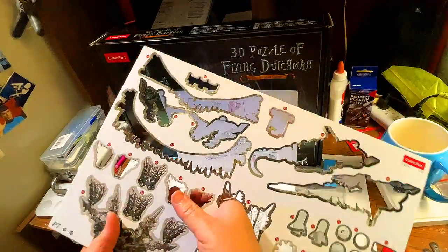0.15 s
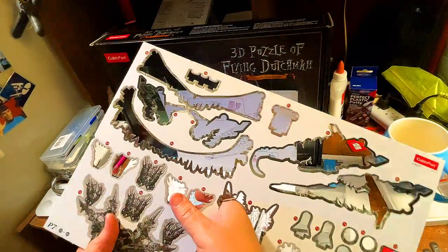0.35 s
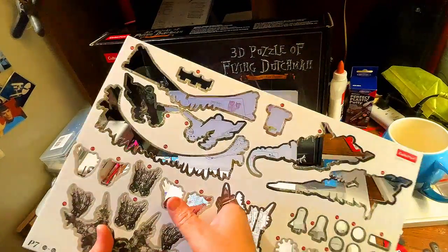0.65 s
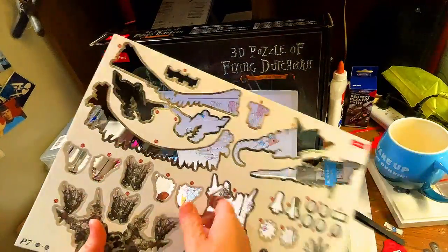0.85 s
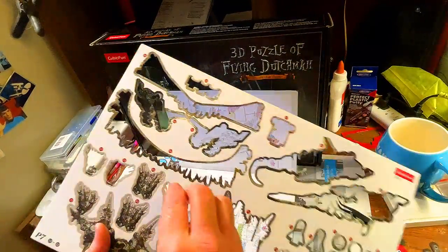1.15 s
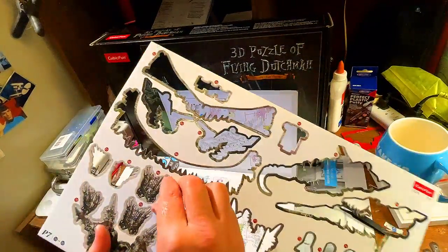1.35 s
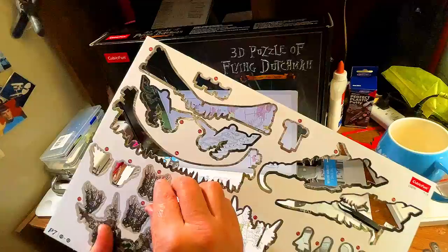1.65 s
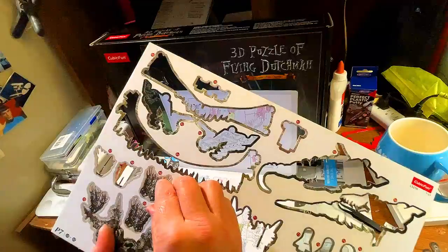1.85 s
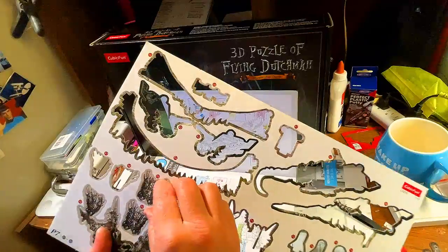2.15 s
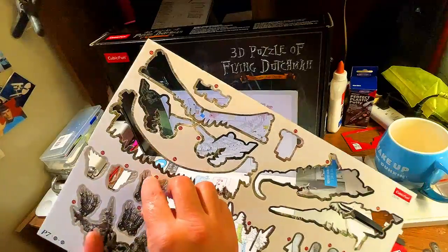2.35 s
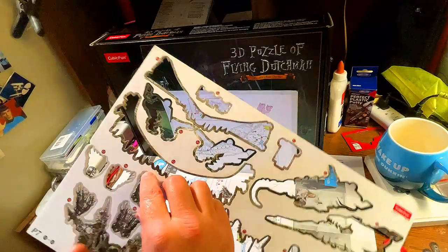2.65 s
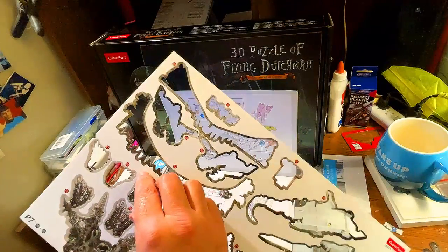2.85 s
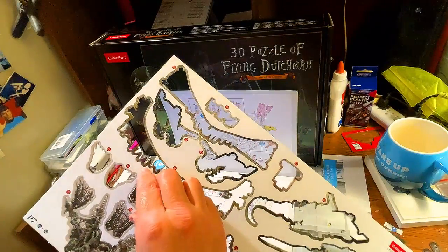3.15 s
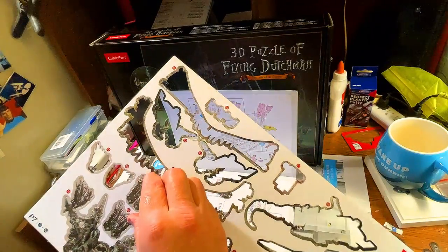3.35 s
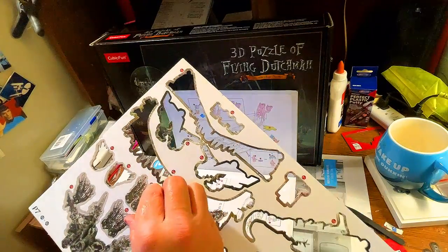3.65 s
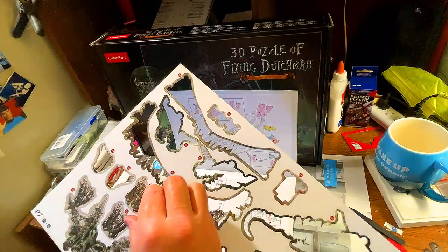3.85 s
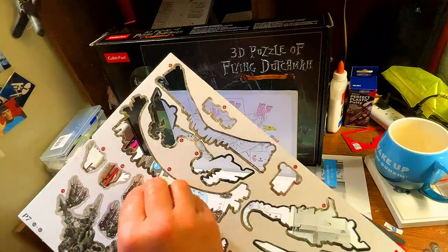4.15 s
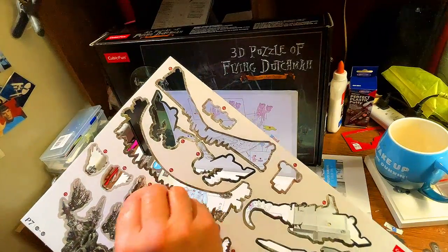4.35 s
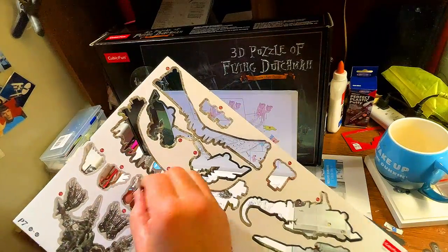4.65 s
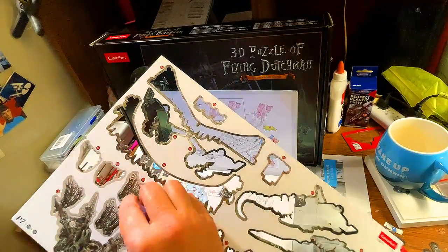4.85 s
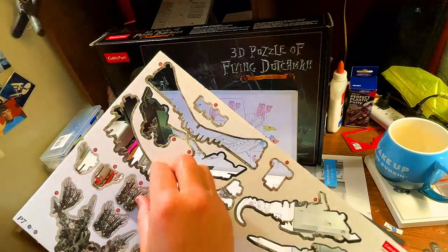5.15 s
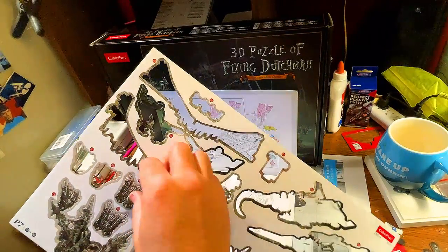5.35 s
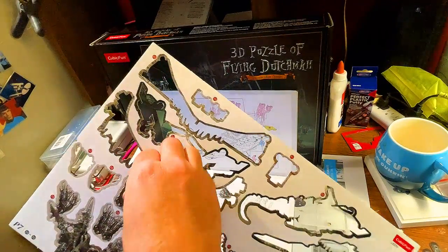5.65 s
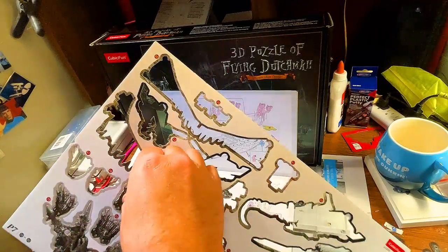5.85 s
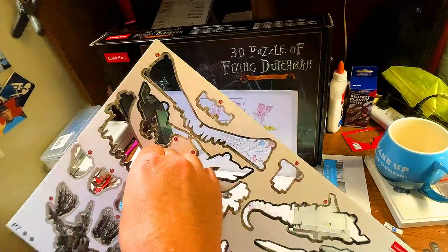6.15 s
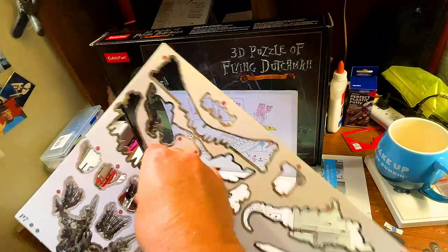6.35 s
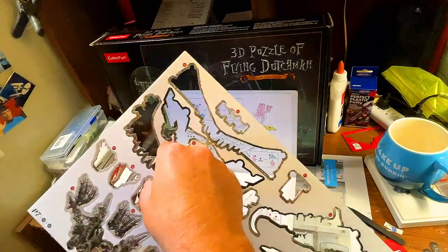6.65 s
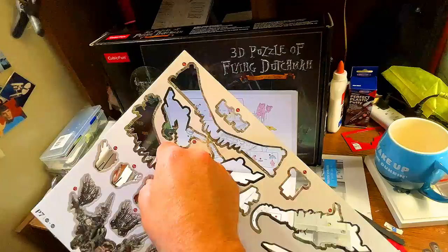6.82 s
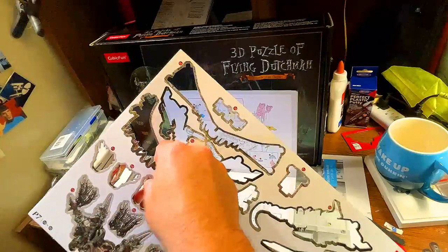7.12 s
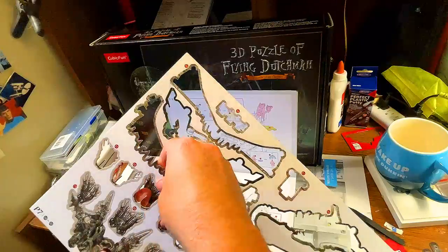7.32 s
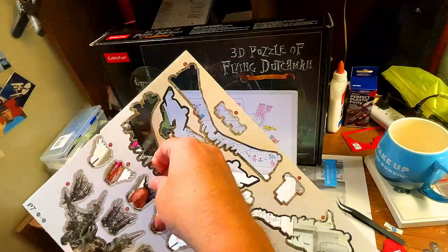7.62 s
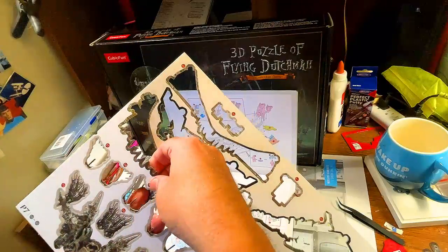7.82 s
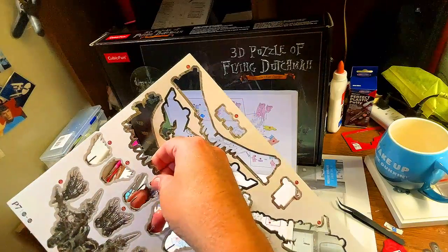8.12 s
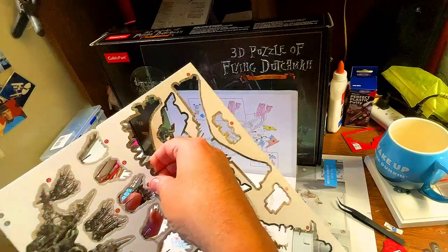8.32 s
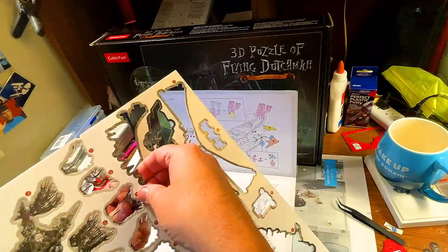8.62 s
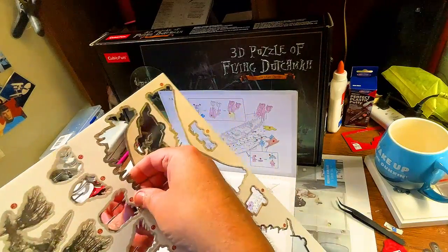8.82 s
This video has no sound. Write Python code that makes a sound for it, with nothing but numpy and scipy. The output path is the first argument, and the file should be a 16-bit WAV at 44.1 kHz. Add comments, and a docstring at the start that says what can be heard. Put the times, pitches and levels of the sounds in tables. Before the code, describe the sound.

Close, crisp cardboard clicks and cracks in uneven clusters, with skin brushing card and brief tearing, in a small quiet room with steady hum.

```python
"""Die-cut puzzle pieces are pressed out of a stiff card sheet, close to the microphone in a small quiet room.
Each tab that holds a piece tears in a burst of tiny fractures, which rings the sheet and the piece;
some facing rips fibre by fibre, fingers slide and scrape over the card, and the sheet bumps dully as it flexes.
A fan (wavering tones in shaped noise) and mains hum lie underneath. The recorder's limiter ducks everything
after the loudest snaps and its noise suppressor turns down faint tails."""
import sys
import numpy as np
from scipy import signal
from scipy.fft import rfft, irfft, next_fast_len
from scipy.io import wavfile
from scipy.ndimage import uniform_filter1d

SR = 44100
rng = np.random.default_rng(int(sys.argv[2]) if len(sys.argv) > 2 else 0)


def wrap_up_sound(samples):
    """Save the sound to the file named by the first command line argument, as 16-bit audio."""
    columns = np.atleast_2d(samples).T
    # keep every value between -1 and 1, then stretch to whole-number steps
    tamed = np.clip(columns, -1, 1)
    steps = np.round(tamed * 32767).astype(np.int16)
    wavfile.write(sys.argv[1], SR, steps)


N = 396018
TIME = np.arange(N) / SR
PIECE_HZ = 2870  # pitch of a middling piece


def amp(db):
    """Decibels to gain."""
    return 10 ** (np.asarray(db) / 20)


def unit(x):
    """Scales to an rms of 1."""
    return x / np.sqrt(np.mean(x ** 2) + 1e-20)


def read(points, hz):
    """Reads a table on a log-frequency axis."""
    f, value = np.transpose(points)
    return np.interp(np.log(hz + 1), np.log(f + 1), value)


def add(mix, s, sound):
    """Mixes a sound in at time s."""
    part = mix[max(round(s * SR), 0):][:len(sound)]
    part += sound[:len(part)]


def band(x, edges):
    """Causal band-pass."""
    return signal.sosfilt(signal.butter(3, edges, "bandpass", fs=SR, output="sos"), x)


def response(points, size=4096):
    """Causal impulse response with the given spectrum, by folding its cepstrum (minimum phase)."""
    cepstrum = irfft(np.log(amp(read(points, np.fft.rfftfreq(size, 1 / SR)))))
    cepstrum[1:size // 2] *= 2
    cepstrum[size // 2 + 1:] = 0
    return irfft(np.exp(rfft(cepstrum)))[:size // 2]


def coloured(x, points):
    """Gives a steady sound a spectrum and an rms of 1."""
    size = next_fast_len(N)
    gain = amp(read(points, np.fft.rfftfreq(size, 1 / SR)))
    return unit(irfft(rfft(x, size) * gain, size)[:N])


def drift(rate):
    """Random wander: straight lines between normal random knots, rate knots a second."""
    knots = np.arange(0, N / SR + 1, 1 / rate)
    return np.interp(TIME, knots, rng.standard_normal(N // 100)[:len(knots)])


def scattered(clicks, decay):
    """Every click spreads through the sheet as a short, dense burst of noise."""
    energy = signal.lfilter([1], [1, -np.exp(-1 / (decay * SR))], clicks ** 2)
    return unit(np.sqrt(energy) * rng.standard_normal(N))


def body_level(hz, middling_db=-10, db_per_octave=-15.5):
    """A larger, lower-pitched piece knocks harder: dB of the body band relative to the snap."""
    return middling_db + db_per_octave * np.log2(hz / PIECE_HZ)


# Tones of the fan. Each entry: multiple of its turning rate.
FAN_ORDERS = [4, 6, 8, 9, 10, 12, 13, 18]
# Level of each of those tones before it wavers. Each entry: rms in dB.
FAN_TONE_DB = [-61, -43.5, -48, -45.5, -54.5, -44, -53.5, -49]
# Low rumble of the fan's air, only its shape. Each row: frequency in Hz, density in dB per Hz.
RUMBLE_SPECTRUM = [(20, -20), (45, -14.5), (68, -2.5), (90, 1.5), (140, 1), (220, 2.5), (290, -1.5),
                   (350, -7), (420, -10), (520, -20.5), (900, -61.5)]
# Soft rush of the fan's air, only its shape. Each row: frequency in Hz, density in dB per Hz.
RUSH_SPECTRUM = [(300, -27), (520, -19.5), (620, -5.5), (720, -9), (900, -17.5), (1020, -11.5), (1200, 2),
                 (1550, -1), (1800, -4), (2400, -1), (3200, -9), (4300, -17.5), (6500, -37.5), (16000, -47)]
# Slow drift of the rush. Each row: time in seconds, rms level in dB.
RUSH_LEVELS = [(0, -48), (1.8, -48), (2.3, -51.5), (3.2, -53.5), (3.6, -46.5), (4.8, -48.5), (5.3, -51),
               (5.9, -46.5), (9, -48.5)]


def fan(turns_per_s=17.05, rumble_db=-44, waver_db=1.9, wander_rad=0.12):
    """Wavering tones at multiples of the turning rate, in a low rumble and a soft rush of moving air."""
    out = amp(rumble_db) * coloured(rng.standard_normal(N), RUMBLE_SPECTRUM)
    rush_db = np.interp(TIME, *np.transpose(RUSH_LEVELS)) + .5 * drift(4.9)
    out += amp(rush_db) * coloured(rng.standard_normal(N), RUSH_SPECTRUM)
    for order, db in zip(FAN_ORDERS, FAN_TONE_DB):
        phase = 2 * np.pi * (order * turns_per_s * TIME + rng.random()) + wander_rad * drift(1.8)
        out += np.sqrt(2) * amp(db + waver_db * drift(7.4)) * np.sin(phase)
    return out


# The hum's first two harmonics. Each entry: rms in dB.
MAINS_LEVELS = [-37.5, -53]


def mains_hum(hum_hz=119.85):
    """Steady hum: a sine at each harmonic."""
    out = np.zeros(N)
    for k, db in enumerate(MAINS_LEVELS):
        out += np.sqrt(2) * amp(db) * np.sin(2 * np.pi * ((k + 1) * hum_hz * TIME + rng.random()))
    return out


# Dull bumps as the sheet gives under the hand.
# Each row: start in seconds, peak in dB, frequency in Hz, length in seconds.
HAND_BUMPS = [(0, -42, 65, 0.42), (1.15, -37, 66.9, .074), (3.46, -39.5, 62.7, 0.17),
              (4.503, -33.5, 381, .011), (4.622, -19.5, 150, 0.017), (4.61, -40, 69.4, 0.083),
              (8.919, -37, 299, 0.041), (8.925, -34.5, 498, 0.03)]
# Low modes in which the sheet recoils from every listed snap.
# Each row: frequency in Hz, peak in dB relative to the snap's body, length in seconds.
RECOIL_MODES = [(185, -11.5, 0.019), (330, -11, .014), (615, -8.5, .009)]


def bumps():
    """The whole sheet flexes for a few cycles, under the hand and at each listed snap."""
    rows = list(HAND_BUMPS)
    for s, db, _, hz, _ in SNAPS:
        for mode_hz, mode_db, length in RECOIL_MODES:
            rows.append((s, db + body_level(hz) + mode_db, mode_hz, length))
    out = np.zeros(N)
    for s, db, hz, length in rows:
        t = np.arange(int(length * SR)) / SR
        add(out, s, amp(db) * np.hanning(len(t)) * np.sin(2 * np.pi * hz * t))
    return out


# Fingers sliding on card. Each row: time of the strongest moment in seconds, length in seconds,
# rasp in dB, brightness (hiss relative to rasp) in dB.
SLIDES = [(.005, .11, -37, 0.5), (0.096, 0.16, -48.5, -3.5), (0.354, 0.3, -52.5, -9),
          (0.553, 0.12, -51, 13), (0.718, 0.053, -63.5, 17), (1.132, 0.29, -46.5, 3),
          (1.397, 0.062, -41, -14.5), (1.458, 0.048, -43, -12), (1.58, .19, -42.5, -3.5),
          (1.912, 0.05, -53, 8.5), (2.74, 0.082, -48, 3.5), (3, 0.059, -35, -3.5), (3.746, 0.43, -50, 7.5),
          (4.175, .03, -40.5, -10.5), (4.55, 0.13, -49.5, -7.5), (4.807, 0.13, -40, 0),
          (4.907, 0.19, -37, -2), (5.203, .065, -53.5, -1), (5.418, 0.038, -48, -30.5),
          (5.478, 0.051, -53, -1.5), (5.964, 0.094, -45, 1), (6.046, 0.13, -44.5, -7),
          (6.212, 0.15, -40, 2), (6.375, 0.25, -51.5, -14), (7.117, 0.093, -45, -2.5),
          (7.464, 0.19, -47.5, 2.5), (7.638, 0.083, -43.5, -31.5), (7.992, .22, -46, -0.5),
          (8.225, 0.4, -46.5, 0), (8.417, 0.19, -49, 1), (8.623, 0.035, -51, 1.5),
          (8.717, 0.082, -39, -9.5)]
# Colour of skin on card. Each row: frequency in Hz, density in dB per Hz.
SKIN_SPECTRUM = [(400, 2), (900, -10.5), (1400, 6.5), (3200, 3), (5000, -5.5), (8000, -16.5), (9500, -7),
                 (11200, 1.5), (13500, -17.5), (16000, -26.5)]


def slides(grain_per_s=260, grain_db=4, grain_decay_s=0.0013, smooth_share=0.6,
           flutter_db=1.55, ring_db=-6, ring_hz=3200, swell_share=0.48):
    """Skin catches on the card in tiny slips that ring the sheet over a smooth hiss; strokes swell and fade."""
    sizes = amp(grain_db * np.minimum(rng.exponential(1, N), 3))
    slips = (rng.random(N) < grain_per_s / SR) * sizes
    grains = scattered(slips, grain_decay_s)
    friction = coloured(grains + smooth_share * rng.standard_normal(N), SKIN_SPECTRUM)
    ring = unit(signal.lfilter(*signal.iirpeak(ring_hz, 9, SR), friction))
    hiss = unit(band(friction, (5500, 16000)) * amp(flutter_db * drift(70)))
    rasp = unit(band(friction, (450, 5500))) + amp(ring_db) * ring
    rasp = unit(rasp * amp(flutter_db * drift(70)))
    out = np.zeros(N)
    for s, length, db, bright_db in SLIDES:
        swell, fade = swell_share * length, (1 - swell_share) * length
        on = slice(max(int((s - swell) * SR), 0), int((s + fade) * SR))
        ramp = np.interp(TIME[on] - s, [-swell, 0, fade], [0, 1, 0])
        speed = np.sin(np.pi / 2 * ramp) ** 2
        out[on] += speed * amp(db) * (rasp[on] + amp(bright_db) * hiss[on])
    return out


def stray_fibres(share=.6, early_s=0.0099, late_s=.035, below_db=-20.5):
    """Single fibres let go just before or after some of the listed snaps, as far fainter snaps."""
    rows = []
    for (s, db, bright_db, hz, tear), (chance, when) in zip(SNAPS, rng.random((len(SNAPS), 2))):
        if chance < share:
            offset = np.interp(when, [0, 1], [-early_s, late_s])
            rows.append((s + offset, db + below_db, bright_db, hz, tear))
    return rows


def edge_catches(per_s=7, level_db=-0.5, bright_db=-6.5, tear_s=0.0048,
                 spread_db=3, spread_octaves=0.34, middle_share=0.71, count=3):
    """A sliding finger catches by chance on cut edges in the middle of a stroke, as faint snaps."""
    rows = []
    for s, length, stroke_db, stroke_bright_db in SLIDES:
        for chance, (when, force, pitch) in zip(rng.random(count), rng.uniform(-1, 1, (count, 3))):
            if chance < per_s * length / count:
                start = s + when * middle_share * length / 2
                db = stroke_db + level_db + spread_db * force
                hz = PIECE_HZ * 2 ** (spread_octaves * pitch)
                rows.append((start, db, stroke_bright_db + bright_db, hz, tear_s))
    return rows


def fractures(t, tear, per_s=3500, spread_db=4, first=1.9):
    """A first break, then fibres giving way at random until the tab is through."""
    sizes = amp(spread_db * np.minimum(rng.exponential(1, len(t)), 3)) * rng.choice([-1, 1], len(t))
    breaks = sizes * (rng.random(len(t)) < per_s / SR) * np.exp(-(t / tear) ** 4)
    breaks[0] = first
    return breaks


def broadband(x, size=4096, count=60):
    """Evens out the broad humps of a burst's spectrum and leaves its fine grain."""
    power = uniform_filter1d(abs(rfft(x, size)) ** 2, size=count)
    inverse_db = -10 * np.log10(abs(power) + 1e-12)
    inverse = response(np.c_[np.fft.rfftfreq(size, 1 / SR), inverse_db])
    return signal.fftconvolve(x, inverse)[:len(x)]


# Tabs snapping and the card clicking under the fingers. Each row: start in seconds, level in dB,
# brightness (fizz relative to that level) in dB, pitch of the piece in Hz, time the tab takes to tear in seconds.
SNAPS = [(0.2084, -27, -19.5, 2900, 0.0024), (0.294, -37.5, -21, 2120, 0.0038),
         (0.4582, -53, 22.5, 4070, 0.0011), (0.5419, -27.5, 10.5, 3050, 0.0034),
         (0.634, -43.5, -14, 1610, .006), (0.7593, -50, 18.5, 4100, 0.0013),
         (1.261, -40.5, -25, 2980, 0.0037), (1.919, -14.5, -0.5, 3020, 0.0079),
         (1.9378, -17.5, 6.5, 3020, 0.0021), (1.9719, -23.5, 8.5, 2710, 0.0064),
         (1.9774, -20, 10.5, 3500, 0.00058), (2.0153, -25, 8, 5150, 0.0015),
         (2.03, -19, 10.5, 3040, 0.0008), (2.0527, -32, 4.5, 2330, .0035), (2.143, -44, 9.5, 4800, 0.0051),
         (2.263, -53.5, 15, 3240, 0.0013), (2.307, -30, 11, 4190, 0.0016),
         (2.3236, -29.5, 6.5, 3950, 0.0017), (2.5964, -27.5, 5.5, 3500, .0012),
         (2.6115, -17.5, 0, 3790, 0.0017), (2.6243, -17, 6.5, 3620, 0.0033),
         (2.716, -39, -2.5, 2350, 0.0085), (2.9106, -42, -34, 1425, 0.0024), (3.06, -26, 4.5, 2700, 0.0022),
         (3.065, -22.5, 2, 2800, 0.0037), (3.0994, -27, 2, 2800, 0.0069), (3.1256, -31, 2.5, 3900, .0035),
         (3.6556, -24, 10, 2500, .0024), (3.66, -21, 3.5, 3000, 0.0013), (3.708, -37.5, 17.5, 3880, 0.0067),
         (3.7187, -30, 15, 2630, 0.00049), (3.7575, -35.5, 12.5, 2600, .0015),
         (3.8125, -28.5, 2, 2580, 0.0014), (3.8686, -23, 7.5, 3400, 0.0011),
         (3.9279, -21.5, 6.5, 2770, 0.00064), (4.1895, -22, 9.5, 3520, 0.002),
         (4.1971, -15, 2, 2750, 0.0033), (4.4952, -40.5, -15.5, 1740, 0.0046),
         (4.882, -34.5, 6.5, 2600, 0.0021), (4.895, -36.5, 9, 3100, .0032), (4.908, -19, -4, 3470, 0.0036),
         (4.9155, -18.5, -2.5, 3570, 0.0026), (4.9432, -31.5, 9, 2190, .0013),
         (6.3343, -37, -2.5, 3080, 0.008), (6.4828, -36, -5.5, 3230, 0.0039),
         (6.583, -15, -1.5, 2000, 0.0044), (7.0231, -36.5, -27, 1690, 0.0022),
         (7.561, -36, -35, 3860, 0.0078), (8.0423, -40, -17, 2594, 0.0024),
         (8.0992, -34, -1.5, 2360, 0.0051), (8.227, -35.5, -7, 2000, 0.004),
         (8.337, -44.5, 12.5, 3070, 0.0053), (8.754, -31.5, 13, 2700, 0.0018),
         (8.763, -28.5, 13, 2900, .0032), (8.767, -21.5, -10, 3160, .0024), (8.7735, -23.5, 7, 3300, 0.012)]
# Body, snap, crack and fizz of a break. Each row: lower edge in Hz, upper edge in Hz.
SNAP_BANDS = [(520, 1700), (1700, 4300), (4300, 9000), (9000, 16000)]
# Colour of breaking card. Each row: frequency in Hz, density in dB per Hz.
CARD_SPECTRUM = [(150, -29), (300, 4.5), (480, -13.5), (620, -22.5), (900, -17), (1300, -6.5), (2300, -3),
                 (3100, 0), (5000, -7.5), (8000, -9.5), (9500, -13), (11000, -3), (13500, -22),
                 (16000, -25)]
# Modes of the sheet. Each row: frequency in Hz, relative level in dB, time to fall 60 dB in seconds.
SHEET_MODES = [(652, -13.5, 0.02), (887, -25.5, 0.013), (1402, -17, .04), (2044, -20, 0.051),
               (3190, -13, 0.0089), (3950, -37.5, 0.017), (4660, -29, 0.022), (10100, -22.5, 0.03)]


def snaps(rows, scatter_db=-17, scatter_t60=0.029, piece_db=-28, piece_t60=0.024, sheet_db=-19, size=2048):
    """Fractures scatter round the sheet as a broadband crack, which rings the sheet and the loosened piece."""
    t, out, colour = np.arange(size) / SR, np.zeros(N), response(CARD_SPECTRUM)
    parts = [band(colour, edges) for edges in SNAP_BANDS]
    for s, db, bright_db, hz, tear in rows:
        scatter = amp(scatter_db - 60 * t / scatter_t60) * rng.standard_normal(size)
        scatter[0] = 1  # the direct sound
        breaks = fractures(t, max(tear, 1 / SR))
        crack = broadband(signal.fftconvolve(breaks, scatter)[:size])
        ring = amp(piece_db - 60 * t / piece_t60) * np.cos(2 * np.pi * hz * t)
        for mode_hz, mode_db, t60 in SHEET_MODES:
            held_hz = mode_hz * rng.uniform(.98, 1.02)  # the grip shifts each mode a little
            ring += amp(sheet_db + mode_db - 60 * t / t60) * np.cos(2 * np.pi * held_hz * t)
        snap = crack + signal.fftconvolve(crack, ring)[:size]
        # a sharper break cracks more, a lower-pitched piece less
        crack_db = -4 + .6 * bright_db + 6 * np.log2(hz / PIECE_HZ)
        for part, rel_db in zip(parts, (body_level(hz), 0, crack_db, bright_db)):
            wave = signal.fftconvolve(snap, part)
            wave *= np.sqrt(SR / 100) / np.linalg.norm(wave)  # level: the band's energy spread over 10 ms
            add(out, s, amp(db + rel_db) * wave)
    return out


# Paper facing that rips slowly, fibre by fibre. Each row: start in seconds, length in seconds,
# level in dB, fizz relative to it in dB, pitch of the piece in Hz.
RIPS = [(1.933, 0.029, -28.5, 6, 2950), (2.303, 0.018, -31, -10, 2700), (3.054, 0.086, -33, -4, 1940),
        (6.166, .089, -44.5, -8, 3150), (8.214, 0.034, -35, 5, 3200), (8.746, 0.0496, -25, -15, 3150),
        (8.916, 0.039, -25.5, -10.5, 2480), (8.95, 0.046, -27, -2.5, 5330)]


def rips(fibres_per_s=900, spread_db=-3.0, decay_s=0.0017, sharp_share=0.18, ring_db=-4, ring_q=10):
    """A dense, uneven run of fibre breaks, each coloured by the card and ringing the piece."""
    sizes = amp(spread_db * np.minimum(rng.exponential(1, N), 3.5)) * rng.choice([-1, 1], N)
    breaks = sizes * (rng.random(N) < fibres_per_s / SR)
    bursts = sharp_share * unit(breaks) + scattered(breaks, decay_s)
    crackle = signal.oaconvolve(bursts, response(CARD_SPECTRUM))[:N]
    low, high = band(crackle, (300, 7000)), band(crackle, (7000, 16000))
    out = np.zeros(N)
    for start, length, db, fizz_db, hz in RIPS:
        on = slice(int(start * SR), int((start + length) * SR))
        ring = unit(signal.lfilter(*signal.iirpeak(hz, ring_q, SR), low[on]))
        rasp = unit(unit(low[on]) + amp(ring_db) * ring)
        envelope = signal.windows.tukey(len(out[on]), .25)
        out[on] += amp(db) * envelope * (rasp + amp(fizz_db) * unit(high[on]))
    return out


# Reverberation of the small room. Each row: frequency in Hz, time to fall 60 dB in seconds.
ROOM_T60 = [(300, 0.5), (1000, 0.056), (3000, .27), (7000, 0.22), (11000, 0.24), (16000, 0.32)]


def room(x, size=256, ragged_db=2):
    """Diffuse reverberation: the energy in each band lingers and dies unevenly at its own speed."""
    frames = dict(nperseg=size, noverlap=size * 3 // 4)
    hz, t, z = signal.stft(x, SR, **frames)
    power = uniform_filter1d(abs(z) ** 2, size=7, axis=0)
    keep = amp(-60 * t[1] / read(ROOM_T60, hz)) ** 2  # power left after one frame step
    lingering = np.array([signal.lfilter([1 - k], [1, -k], p) for k, p in zip(keep, power)])
    diffuse = signal.stft(rng.standard_normal(N), SR, **frames)[2]
    diffuse *= np.sqrt(abs(lingering) / np.mean(abs(diffuse) ** 2))
    tail = signal.istft(diffuse, SR, **frames)[1]
    delayed = np.r_[np.zeros(size), tail][:N]
    return delayed * amp(ragged_db * drift(200))


def suppress(x, threshold_db=-86, depth_db=10, slope=.8, size=512):
    """Noise suppressor: whatever is fainter than a threshold in its band is turned down further."""
    frames = dict(nperseg=size, noverlap=size * 3 // 4)
    z = signal.stft(x, SR, **frames)[2]
    power = uniform_filter1d(uniform_filter1d(abs(z) ** 2, size=5, axis=0), size=3, axis=1)
    under_db = threshold_db - 10 * np.log10(abs(power) + 1e-16)
    cut_db = np.clip(slope * under_db, 0, depth_db)
    return signal.istft(z / amp(cut_db), SR, **frames)[1][:N]


def limiter_cut(x, limit_db=-13.5, recover_db_per_s=8, attack_s=0.0076):
    """Limiter: dB of cut that closes just after a loud snap and recovers slowly."""
    keep = np.exp(-1 / (attack_s * SR))
    smooth = [1 - keep], [1, -keep]
    power_db = 10 * np.log10(signal.lfilter(*smooth, x ** 2) + 1e-12)
    fall = TIME * recover_db_per_s
    held_db = np.maximum.accumulate(power_db + fall) - fall  # peaks held, sinking steadily
    return signal.lfilter(*smooth, np.maximum(held_db - limit_db, 0))


def scene(room_db=-14):
    """The card close by and its reverberation, the sheet's bumps, the fan and the hum."""
    air = fan() + mains_hum()
    ticks = stray_fibres() + edge_catches()
    card = slides() + rips() + snaps(SNAPS + ticks)
    return (card + amp(room_db) * room(card) + bumps() + air)[None]


def record(dry, edge_hz=15800):
    """Noise suppression, the limiter (steered by the unsuppressed sound), clipping at full scale, a low-pass."""
    limited = suppress(dry[0])[None] / amp(limiter_cut(dry[0]))
    clipped = np.clip(limited, -1, 1)
    low_pass = signal.firwin(301, edge_hz, window=("kaiser", 8), fs=SR)
    return signal.oaconvolve(clipped, low_pass[None], "same")


dry = scene()
out = record(dry)
wrap_up_sound(out)
```